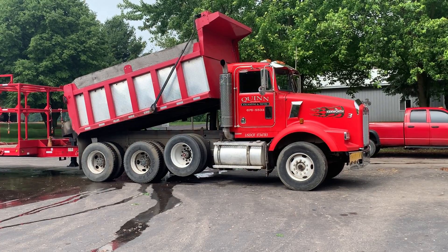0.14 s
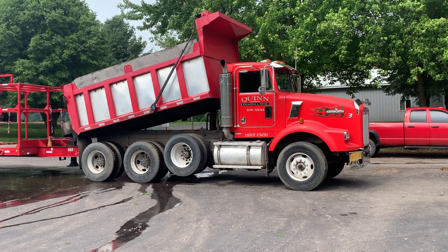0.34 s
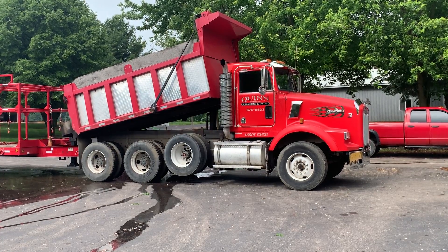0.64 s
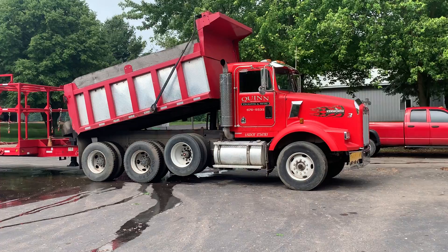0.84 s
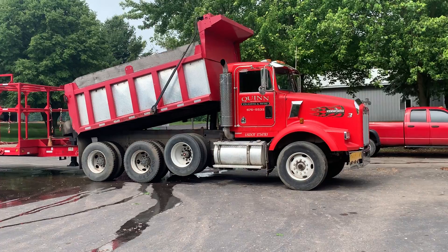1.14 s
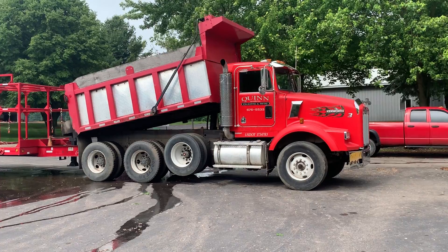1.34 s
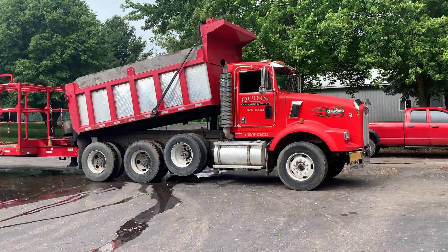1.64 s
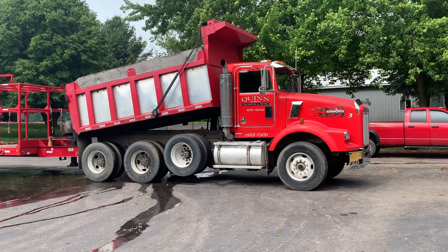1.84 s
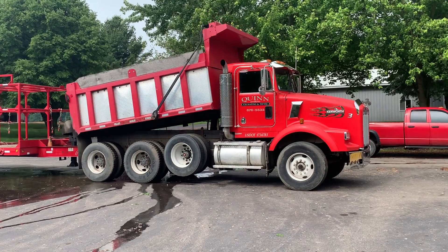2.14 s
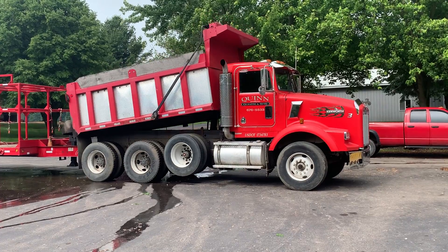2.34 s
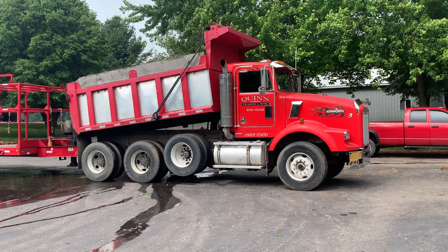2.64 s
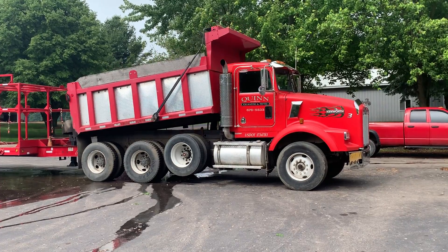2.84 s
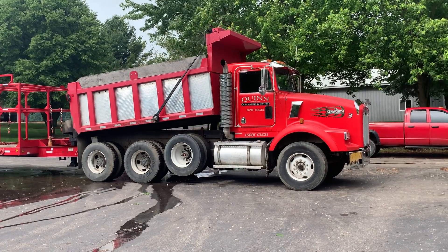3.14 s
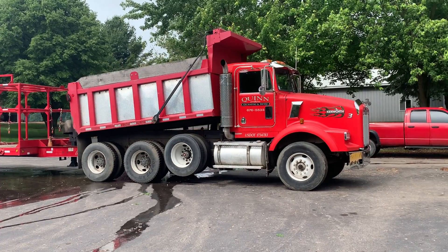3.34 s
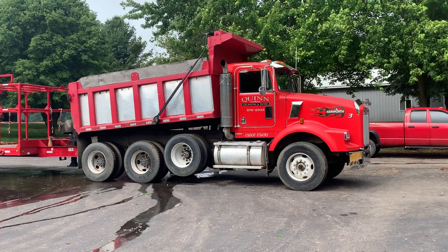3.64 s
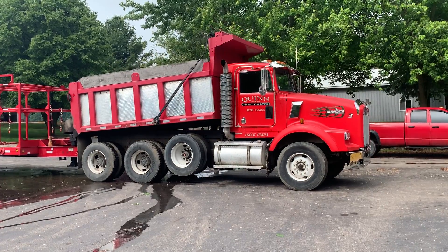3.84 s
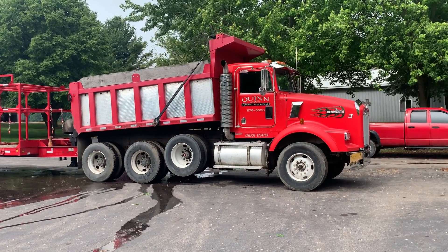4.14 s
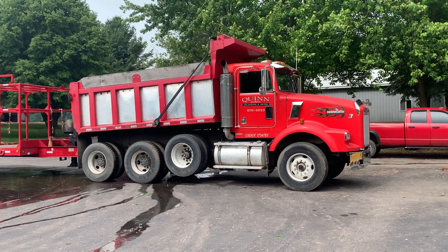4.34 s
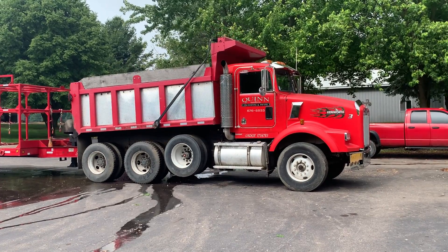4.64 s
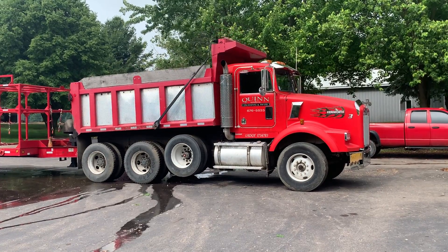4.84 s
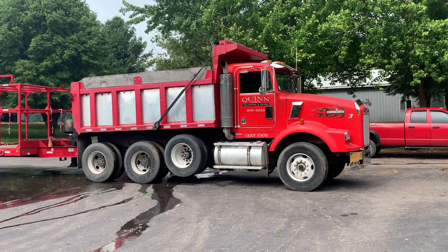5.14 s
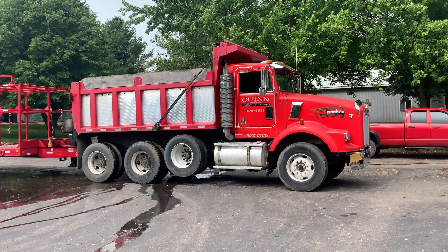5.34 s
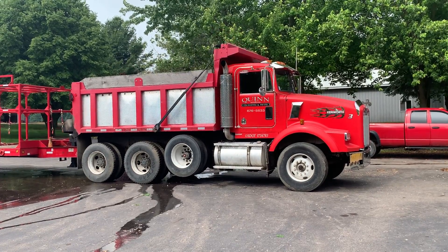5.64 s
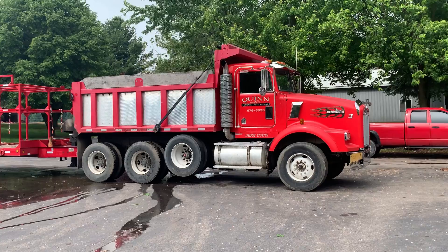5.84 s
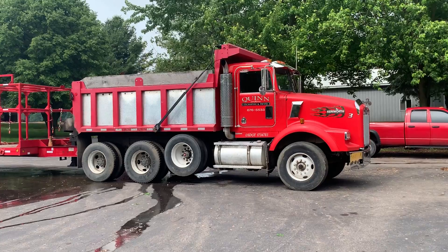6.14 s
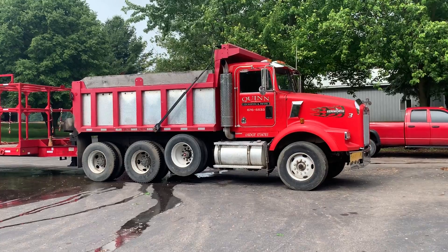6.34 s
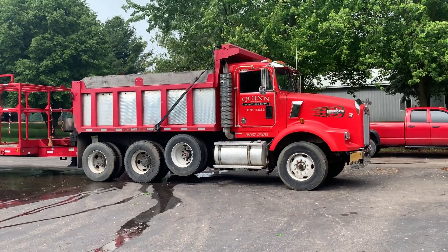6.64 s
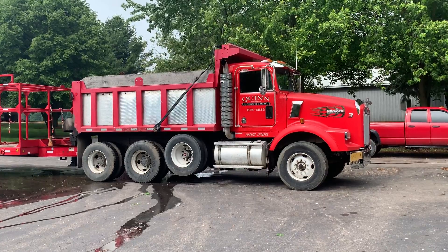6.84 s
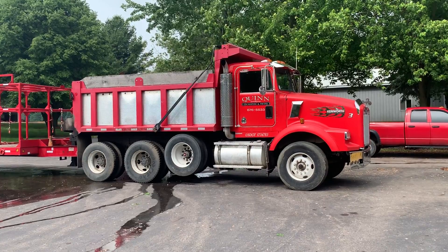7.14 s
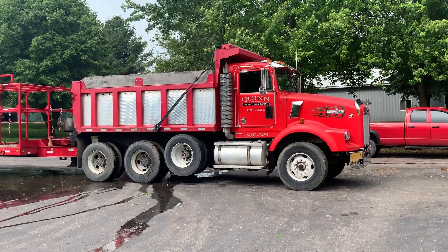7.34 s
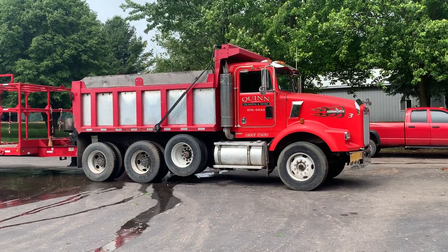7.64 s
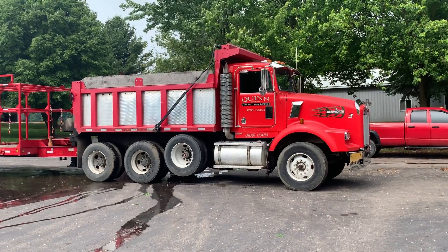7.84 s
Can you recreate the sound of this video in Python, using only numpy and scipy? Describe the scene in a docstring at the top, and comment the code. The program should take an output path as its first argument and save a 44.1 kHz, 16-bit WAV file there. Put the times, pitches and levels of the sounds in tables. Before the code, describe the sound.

A heavy diesel engine idles steadily on an outdoor lot, with a deep exhaust boom, quick metallic clatter and wavering pump hum. A dull clunk comes about two seconds in, then the sound sinks to a faint murmur for most of a second. It returns abruptly with a rough oil roar that later tapers off. Fine hiss runs throughout; stereo microphone nearby.

```python
"""A six-cylinder diesel dump truck idles on a paved lot while its hydraulic hoist lets the bed down. Tuned
lines make its exhaust boom and its pump and fan hum; shaped noise makes a clatter that returns every engine
cycle. A fine noise hiss runs throughout, with a few thin, high sizzles in the first three seconds or so. A
damped double clunk comes about two seconds in, among the sizzles; the truck then turns faint and muffled for
most of a second, and returns with oil churning as a noisy roar. The oil's flow is throttled off, and near the
end the exhaust slowly eases."""
import sys
import numpy as np
from scipy import signal
from scipy.fft import rfft, irfft, next_fast_len
from scipy.io import wavfile
from scipy.ndimage import uniform_filter1d, map_coordinates

SR = 44100
rng = np.random.default_rng(int(sys.argv[2]) if len(sys.argv) > 2 else 0)


def bounce(signal):
    """Save signal as a 16-bit WAV file at the path given by the first command-line argument."""
    frames = np.transpose(np.atleast_2d(signal))
    limited = np.clip(frames, -1, 1)
    pcm = np.round(limited * 32767).astype(np.int16)
    wavfile.write(sys.argv[1], SR, pcm)


N = 353241
T = np.arange(N) / SR  # seconds

# likeness of the engine's sound at the two ears: pitch_hz, likeness (0 to 1)
EAR_LIKENESS = [(60, .997), (200, .96), (430, .84), (620, .48), (830, .45), (1200, .8), (2200, .8),
                (3000, .62), (5000, .35), (7500, .55)]
# how much louder the engine is at the left ear: pitch_hz, left_over_right_db
EAR_BALANCE = [(150, 9), (400, -0.5), (650, 0.5), (900, -7), (1150, -6.5), (1500, -2.5), (2200, 0),
               (3200, -3), (4300, -2.5), (5100, -8.5), (7000, 1.5)]
# how far the engine's left side leads in phase: pitch_hz, left_lead_radians
EAR_LEAD = [(100, 0), (450, -.4), (660, 0), (900, -.45), (1400, -.45), (1900, .7), (2200, -.1), (2650, 1.3),
            (3300, -.6), (4300, .2), (5400, 3.9), (6800, 6), (7800, 4)]

IDLE_HZ = 36.3  # firings a second at the settled idle
HALVES = np.array([[.5], [-.5]])  # shares a left-right difference between the two ears


def amp(db):
    """Decibels to gain."""
    return 10 ** (np.asarray(db) / 20)


def unit(x):
    """Scaled to rms 1."""
    return x / np.sqrt(np.mean(x ** 2) + 1e-20)


def along(points, hz):
    """(Hz, value) points read on a log frequency axis."""
    point_hz, value = np.transpose(points)
    return np.interp(np.log(hz + 1), np.log(point_hz + 1), value)


def curves(rows):
    """One value per sample for each column after the time."""
    s, *columns = np.transpose(rows)
    return [np.interp(T, s, column) for column in columns]


def wobble(rate):
    """A smooth random curve, rate knots a second."""
    knots = rng.standard_normal(int(N * rate / SR) + 4)
    return map_coordinates(knots, [T * rate])


def filtered(x, response):
    """x times a complex response of frequency."""
    size = x.shape[-1]
    padded = next_fast_len(size + 4096, True)
    spectrum = rfft(x, padded) * response(np.fft.rfftfreq(padded, 1 / SR))
    return irfft(spectrum, padded)[..., :size]


def causal(gain_db):
    """The minimum-phase response with this gain: it rings after a blow, never before."""
    cepstrum = irfft(np.log(amp(gain_db)))
    half = len(cepstrum) // 2
    folded = np.r_[cepstrum[0], 2 * cepstrum[1:half], cepstrum[half]]
    return np.exp(rfft(folded, len(cepstrum)))


def spread(pair, alike, lead, balance):
    """Two unrelated signals become left and right with a given likeness, phase lead and balance."""
    def mid_side(hz):
        turn = np.arccos(np.clip(along(alike, hz), -1, 1)) / 2
        return np.array([np.cos(turn), np.sin(turn)])

    def ears(hz):
        return amp(HALVES * along(balance, hz)) * np.exp(1j * HALVES * along(lead, hz))

    mid, side = filtered(pair, mid_side)
    return filtered(np.array([mid + side, mid - side]), ears)


def from_right(x, lead_s=0.000064):
    """One signal at the two ears, reaching the right one lead_s sooner."""
    return filtered(x, lambda hz: np.exp(1j * np.pi * hz * lead_s * np.array([[-1], [1]])))


def exhaust(cycle, waver_db=0.7, uneven_db=1):
    """Low orders of the cycle; those between the firing orders come from unequal cylinders and waver more."""
    # exhaust boom before it is scaled to rms 1: order (multiple of the cycle rate), level_db
    orders = [(6, -8.3), (7, -17.5), (8, -13), (9, -24), (10, -16.5), (12, 1.5), (13, -18.5), (14, -25),
              (15, -19), (16, -25), (17, -26), (18, -4), (19, -17.5), (20, -16), (22, -19)]
    boom = np.zeros(N)
    for order, db in orders:
        order = round(order)
        if order % 6 == 0:
            # the crank surges at each firing: a quarter turn makes the neighbours of the main order
            # swing its pitch more than its level
            start, waver = (0 if order == 12 else 1 / 4), waver_db
        else:
            start, waver = rng.random(), uneven_db
        boom += amp(db + waver * wobble(5.6)) * np.cos(2 * np.pi * (order * cycle + start))
    return unit(boom)


def exhaust_level_db(firing, flow):
    """The boom grows with engine speed and oil flow; with the bed down, the exhaust eases off."""
    speed_db = 0.8 * (firing - IDLE_HZ)  # dB per extra firing a second
    flow_db = 0.75 * flow
    ease_start_s, ease_db_per_s = 7, 1
    return -26.5 + speed_db + flow_db - ease_db_per_s * np.maximum(T - ease_start_s, 0)


def clatter(cycle, flow):
    """Knocks and gear noise set the rhythm; the ringing block sets the colour, oil flow fills the low mids."""
    # ringing of the block and its covers: pitch_hz, width_hz, boost_db
    block = [(200.8, 16, 6), (411.5, 43, 8), (666, 83, 4.5), (743, 68, 5.5), (932.4, 59, 9.5),
             (1077, 29, 6.5), (1165, 65, 6.5), (1324, 33, 4), (1424, 45, 4.5), (1546, 36, 7.5),
             (1678, 31, 4.5), (1817, 120, 7), (2006, 37, 6), (2160, 130, 5), (2333, 38, 10.5),
             (2592, 310, 7.5), (3035, 190, 6.5), (3496, 73, 7.5), (3923, 420, 8), (4287, 92, 11.5),
             (4775, 270, 11.5), (5250, 240, 8.5), (6080, 48, 7.5), (6820, 60, -8.5)]
    # broad colour of the clatter before it is scaled to rms 1: pitch_hz, level_db
    colour = [(30, -100), (50, -92), (85, -91.5), (160, -58.5), (280, -61.5), (500, -64.5), (800, -63.5),
              (1100, -61.5), (1800, -65.5), (2600, -75), (3300, -72), (4000, -85), (5500, -83.5),
              (7300, -78), (9000, -100), (14000, -115)]
    # at a flow of 1 the gears rattle harder in the low mids: pitch_hz, extra_db
    load = [(150, -5), (260, 1.5), (400, -0.5), (560, 3), (700, 4.5), (850, 2.3), (1100, 0), (2000, 0.44)]
    blows = knocks(cycle)
    bands, powers = signal.welch(blows, SR, nperseg=1024, detrend=False)

    def body(hz):
        modes = sum(db / (1 + (2 * (hz - centre) / width) ** 2) for centre, width, db in block)
        wanted_db = along(colour, hz) + modes
        # take out the blows' own average colour, leaving the block's
        return np.array([causal(wanted_db - 10 * np.log10(np.interp(hz, bands, power))) for power in powers])

    idle = unit(spread(filtered(blows, body), EAR_LIKENESS, EAR_LEAD, EAR_BALANCE))
    return idle + flow * filtered(idle, lambda hz: amp(along(load, hz)) - 1)


def knocks(cycle):
    """The low knocks come back mostly alike every cycle, the high ones are loose."""
    # how nearly the clatter repeats in each cycle: pitch_hz, share_of_power (0 to 1)
    repeats = [(200, .5), (400, .62), (700, .78), (1100, .9), (1450, .62), (2300, .48), (3000, .15),
               (5000, .08)]
    tight = filtered(tight_rattle(cycle), lambda hz: np.sqrt(along(repeats, hz)))
    loose = filtered(loose_rattle(cycle), lambda hz: np.sqrt(1 - along(repeats, hz)))
    return tight + loose


def knock_gain(position, hz, scatter_db, boost_db=2.5, rise_s=.0028):
    """Each knock spreads through the block over rise_s, then dies away over an even gear noise."""
    # knocks of one engine cycle: share_of_cycle, pitch_hz, level_db (over the gear noise, before the boost),
    # half_width_octaves, t60_s
    knock_table = [(0.002, 840.0, 17.0, 0.11, 0.025), (0.061, 2160.0, 17.5, 0.17, 0.025),
                   (0.076, 1550.0, 10.0, 0.11, 0.12), (0.096, 1000.0, 13.0, 0.23, 0.111),
                   (0.118, 460.0, 8.0, 0.25, 0.12), (0.122, 1720.0, 21.0, 0.15, 0.014),
                   (0.16, 730.0, 12.5, 0.32, 0.03), (0.2, 960.0, 16.0, 0.21, 0.033),
                   (0.232, 1290.0, 11.0, 0.79, 0.043), (0.248, 410.0, 11.5, 0.23, 0.027),
                   (0.248, 3710.0, 6.5, 0.16, 0.12), (0.27, 1120.0, 18.5, 0.14, 0.068),
                   (0.279, 1770.0, 16.5, 0.22, 0.027), (0.301, 630.0, 14.5, 0.18, 0.019),
                   (0.306, 230.0, 8.5, 0.24, 0.056), (0.31, 1620.0, 23.0, 0.3, 0.012),
                   (0.322, 810.0, 16.0, 0.17, 0.018), (0.337, 410.0, 10.5, 0.23, 0.032),
                   (0.351, 1100.0, 22.5, 0.12, 0.034), (0.362, 1600.0, 7.5, 0.9, 0.094),
                   (0.401, 880.0, 15.0, 0.13, 0.076), (0.419, 1280.0, 8.5, 0.43, 0.105),
                   (0.425, 480.0, 8.5, 0.19, 0.08), (0.449, 970.0, 19.0, 0.13, 0.042),
                   (0.45, 730.0, 13.5, 0.17, 0.087), (0.455, 5700.0, 6.0, 0.17, 0.055),
                   (0.488, 210.0, 9.5, 0.17, 0.051), (0.518, 3180.0, 8.5, 0.3, 0.034),
                   (0.547, 4520.0, 3.0, 0.9, 0.12), (0.551, 750.0, 18.0, 0.24, 0.016),
                   (0.559, 3520.0, 8.5, 0.1, 0.12), (0.571, 1250.0, 9.5, 0.46, 0.12),
                   (0.58, 420.0, 14.0, 0.46, 0.025), (0.602, 1000.0, 20.5, 0.21, 0.083),
                   (0.607, 1850.0, 12.5, 0.18, 0.109), (0.644, 3460.0, 23.5, 0.1, 0.012),
                   (0.663, 1100.0, 19.0, 0.13, 0.047), (0.701, 530.0, 13.0, 0.3, 0.017),
                   (0.736, 1050.0, 12.0, 0.8, 0.093), (0.802, 1750.0, 15.0, 0.23, 0.02),
                   (0.811, 1070.0, 19.0, 0.18, 0.021), (0.818, 710.0, 14.0, 0.28, 0.047),
                   (0.859, 2670.0, 7.5, 0.88, 0.067), (0.882, 6210.0, 10.5, 0.57, 0.016),
                   (0.888, 590.0, 13.0, 0.19, 0.028), (0.896, 1090.0, 8.0, 0.23, 0.098),
                   (0.926, 1880.0, 8.5, 0.13, 0.12), (0.991, 1050.0, 14.5, 0.27, 0.023)]
    power = np.ones((len(hz), len(position)))
    for share, centre, db, octaves, t60 in knock_table:
        turn, part = np.divmod(position - share + 1, 1)
        age = part * 6 / IDLE_HZ  # seconds since the knock
        scatter = rng.standard_normal(int(turn[-1]) + 1)[turn.astype(int)]
        strength = db + boost_db + scatter_db * scatter
        envelope = amp(strength - 60 * age / t60) * (1 - np.exp(-age / rise_s))
        pitch_shape = np.exp(-(np.log2((hz + 1) / centre) / octaves) ** 2)
        power += np.outer(pitch_shape, envelope ** 2)
    return np.sqrt(power)


def tight_rattle(cycle, size=7200, count=8):
    """One loop of noise returns every cycle, evened out band by band until it follows the knocks."""
    centres = np.geomspace(350, 9500, 48)[:, None] - 250
    widths = 30 + .05 * centres
    bank = np.exp(-.5 * ((np.fft.fftfreq(size, 1 / SR) - centres) / widths) ** 2)
    bank /= np.sqrt((bank ** 2).sum(0) + 1e-3)
    position = np.arange(size) / size
    wanted = knock_gain(position, centres[:, 0], 0) * 2 * np.sqrt((bank ** 2).mean(1, keepdims=True))
    loop = np.fft.fft(rng.standard_normal((2, 1, size)))
    for _ in range(count):
        bands = np.fft.ifft(bank * loop)
        evened = wanted * bands / abs(bands)
        loop = (bank * np.fft.fft(evened)).sum(1, keepdims=True)
    sides = np.fft.ifft(loop[:, 0]).real
    return np.array([map_coordinates(side, [cycle % 1 * size], mode="grid-wrap") for side in sides])


def loose_rattle(cycle, scatter_db=1.1, grain_db=1.0):
    """Gritty noise that is new in every cycle, each knock with a strength of its own."""
    hz, s, noise = signal.stft(rng.standard_normal((2, N)), SR, nperseg=128)
    grit = uniform_filter1d(rng.standard_normal(noise.shape[1:]), size=5, axis=0)
    grit = unit(uniform_filter1d(grit, size=3, axis=1))
    gain = knock_gain(np.interp(s, T, cycle), hz, scatter_db) * amp(grain_db * grit)
    return signal.istft(noise * gain, nperseg=128)[1][:, :N]


def driven_hum(cycle, firing, flow, waver_db=2.5, drift_db=1.0, slip=0.17):
    """Lines tied to the crankshaft follow speed and oil flow, throb once a cycle, waver and sometimes swell."""
    # hum of the engine's driven pump and fan: order (multiple of the cycle rate), level_db (at the settled
    # idle), speed_db (per extra firing a second), flow_db (at a flow of 1), throb_db, peak_share_of_cycle
    hum_lines = [(24, -42, 9, 0, 2, .33), (30, -52, 12, -1, 2, .33), (34, -49.5, 5, .5, 2, .33),
                 (48, -51, 7, 0, 2, .33), (66, -48, 1, 0.5, 5, .28), (90, -55, 12, 6, 3, .8),
                 (120, -50.5, 8, 1.5, 4, .7), (153, -52, 8, 0, 6, .55)]
    # single lines that swell for a while: peak_s, half_length_s, order (multiple of the cycle rate), level_db
    swells = [(.3, .35, 80, -46), (1.4, .25, 42, -46), (1.98, .15, 48, -44), (4.15, .25, 48, -42),
              (5.35, .45, 95, -45), (6.25, .15, 48, -45), (6.3, .7, 24, -41), (7.35, .4, 48, -42),
              (7.9, .3, 385, -50)]

    def line(order):
        turns = order * cycle + slip * wobble(3) + rng.random()
        return np.sqrt(2) * np.sin(2 * np.pi * turns)

    hum = np.zeros(N)
    for order, db, speed_db, flow_db, throb_db, peak_share in hum_lines:
        level = db + speed_db * (firing - IDLE_HZ) + flow_db * flow
        throb = throb_db * np.cos(2 * np.pi * (cycle - peak_share))
        unrest = waver_db * wobble(6) + drift_db * wobble(1.23) + throb
        hum += amp(level + unrest) * line(order)
    for s, length, order, db in swells:
        hum += amp(db) * np.exp(-.5 * ((T - s) / length) ** 4) * line(order)
    return hum


def oil_flow(open_s=0.11, close_db_per_s=12):
    """Flow of the oil: it builds over open_s, holds, and is slowly throttled off."""
    # openings of the lowering valve: fully_open_s, starts_to_close_s, flow_level_db
    valve = [(0, .1, -7.5), (2.6, 4.897, 0.5)]
    flow = np.zeros(N)
    for opens, closes, db in valve:
        attack = np.clip((T - opens) / open_s + 1, 0, 1)
        flow += attack * amp(db - close_db_per_s * np.maximum(T - closes, 0))
    return flow


def hoist(flow, oil_db=-37.5, rough_db=2.0, churn_rate=90):
    """Oil churns through the open valve in a rough, irregular roar: oil_db is its level at a flow of 1."""
    # colour of the roar before it is scaled to rms 1: pitch_hz, level_db
    oil_colour = [(150, -35), (350, -10), (560, 6), (690, 7.5), (820, -2), (1250, 2.5), (1700, -16),
                  (5000, -45)]
    churn = rng.standard_normal((2, N)) * amp(rough_db * wobble(churn_rate))
    oil = filtered(churn, lambda hz: amp(along(oil_colour, hz)))
    return amp(oil_db) * flow * unit(spread(oil, EAR_LIKENESS, EAR_LEAD, EAR_BALANCE))


def clunk(thud_db=-9):
    """A dull, quickly damped double blow in the hoist, with a thud an octave below its ring."""
    # blows of the clunk: start_s, level_db, pitch_hz, t60_s
    blow_table = [(2.108, -13.3, 620, .022), (2.113, -23, 480, .03)]
    out = np.zeros(N)
    for s, db, hz, t60 in blow_table:
        age = np.maximum(T - s, 0)
        ring = np.sin(2 * np.pi * hz * age)
        thud = amp(thud_db) * np.sin(np.pi * hz * age)
        out += amp(db - 60 * age / t60) * (ring + thud)
    return out


def muffle(truck, flow, start_s=2.2, end_s=3.05, fade_t60=0.05, bass_hz=170, bass_lag_s=0.021, open_s=0.033):
    """The truck sinks to a dull, centred murmur, its bass last of all, then comes back."""
    # what is left of the truck in the muffled spell: pitch_hz, gain_db
    muffled = [(35, -19), (50, -17), (65, -36), (75, -37), (110, -34), (200, -30), (400, -18), (520, -21),
               (700, -21.5), (1000, -22.5), (1320, -13.5), (1800, -23), (2400, -32.5), (3100, -42),
               (4500, -38), (6200, -26.5), (7500, -57)]
    # while the oil flows, the murmur fills out: pitch_hz, extra_db (at a flow of 1)
    fill = [(170, -0.5), (280, 1.5), (400, 0.5), (520, 1.5), (850, 1.5), (1200, 0), (2000, -0.5)]
    back = np.sin(np.pi / 2 * np.clip((T - end_s) / open_s + .5, 0, 1)) ** 2

    def clear(start):
        fade = amp(-60 * np.maximum(T - start, 0) / fade_t60)
        return np.maximum(fade, back)

    bass = filtered(truck, lambda hz: 1 / (1 + (hz / bass_hz) ** 4))
    # undoing the left-right balance centres the murmur
    murmur = filtered(truck, lambda hz: amp(along(muffled, hz) - HALVES * along(EAR_BALANCE, hz)))
    murmur = murmur + flow * filtered(murmur, lambda hz: amp(along(fill, hz)) - 1)
    upper = clear(start_s)
    return upper * (truck - bass) + clear(start_s + bass_lag_s) * bass + (1 - upper) * murmur


def hiss(hiss_db=-46.0, flicker_db=1.2, sizzle_rise_s=0.038, sizzle_t60=.6):
    """A fine noise hiss at the top of the range, with thin bands of noise that swell and fade as sizzles."""
    # colour of the hiss before it is scaled to rms 1: pitch_hz, level_db
    hiss_colour = [(6500, -70), (7750, -35), (8000, 0), (9300, -1.5), (10500, -5), (12500, -7.5),
                   (14500, -7.5), (15800, -11)]
    # how far the left side leads in phase: pitch_hz, left_lead_radians
    hiss_lead = [(7000, -2.4), (8550, -3.1), (9100, -3.7), (10900, -6.3), (12700, -8.8), (13400, -9.4),
                 (14100, -10.2), (15600, -12.5)]
    # thin high sizzles: peak_s, pitch_hz, width_hz, level_db (before the stereo spread)
    sizzles = [(.92, 12800, 400, -36.5), (1.27, 13500, 1300, -37), (2.48, 13700, 1300, -34),
               (2.98, 13800, 1000, -28), (3.03, 14600, 500, -35)]
    noise = filtered(rng.standard_normal((2, N)), lambda hz: amp(along(hiss_colour, hz)))
    air = amp(hiss_db + flicker_db * wobble(25)) * unit(noise)
    for s, centre, width, db in sizzles:
        band = filtered(rng.standard_normal(N), lambda hz: 1 / (1 + (2 * (hz - centre) / width) ** 4))
        swell = np.exp(-.5 * (np.minimum(T - s, 0) / sizzle_rise_s) ** 2)
        fade = amp(db - 60 * np.maximum(T - s, 0) / sizzle_t60)
        air[0] += unit(band) * swell * fade
    return spread(air, [(8000, 0.97)], hiss_lead, [(8000, 0)])


def scene():
    """The crankshaft drives the engine's layers: six firings make one cycle. The valve sets the flow of oil."""
    # idle speed, which picks up as the hoist valve opens: time_s, firings_per_s
    idle_speed = [(0, 35.28), (2.1, 35.76), (2.7, 36.22), (5.2, 36.29), (6.2, 36.48), (8, 36.41)]
    firing, = curves(idle_speed)
    cycle = np.cumsum(firing) / SR / 6  # engine cycles so far
    flow = oil_flow()
    boom = amp(exhaust_level_db(firing, flow)) * exhaust(cycle)
    drone = from_right(boom + driven_hum(cycle, firing, flow))
    truck = drone + amp(-28) * clatter(cycle, flow) + hoist(flow) + clunk()
    return muffle(truck, flow) + hiss()


def record(dry):
    """Nothing is kept from the band limit of 15800 Hz up."""
    return filtered(dry, lambda hz: hz < 15800)


dry = scene()
out = record(dry)
bounce(out)
```